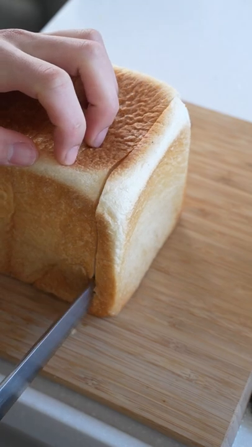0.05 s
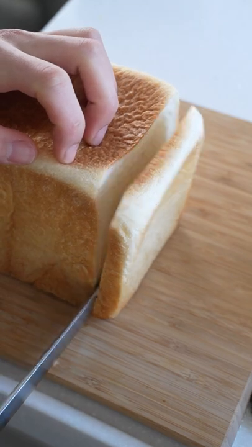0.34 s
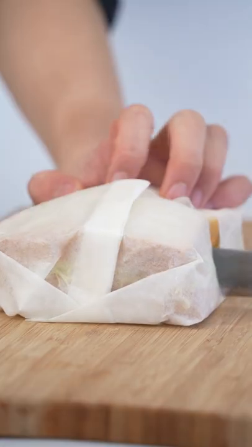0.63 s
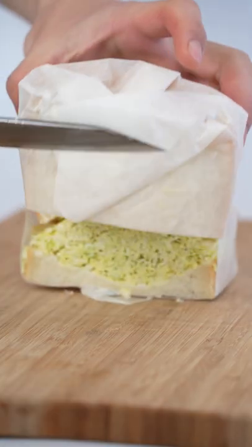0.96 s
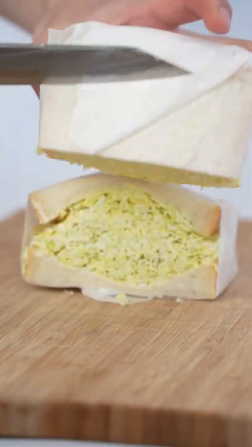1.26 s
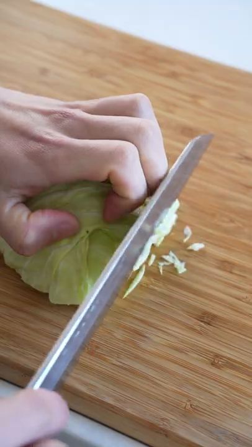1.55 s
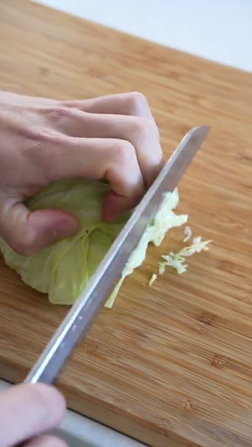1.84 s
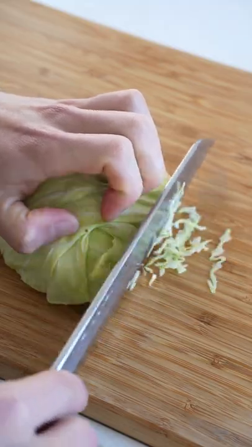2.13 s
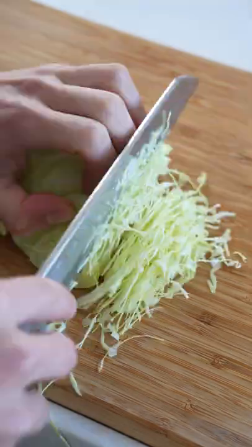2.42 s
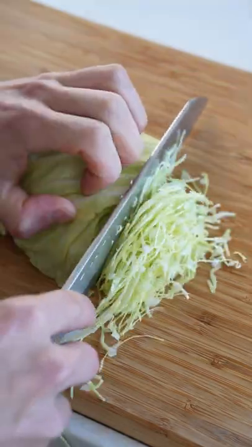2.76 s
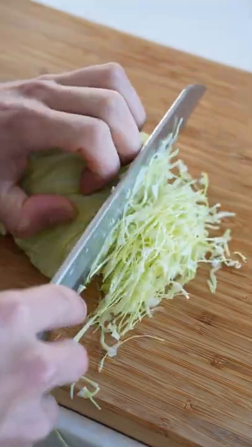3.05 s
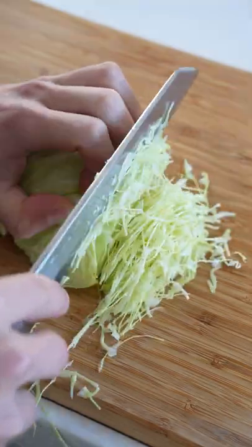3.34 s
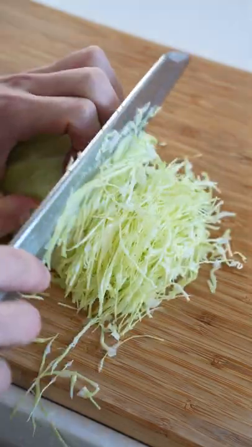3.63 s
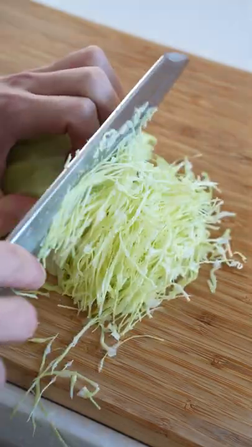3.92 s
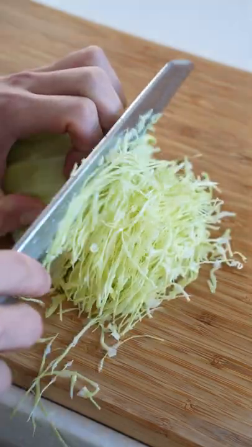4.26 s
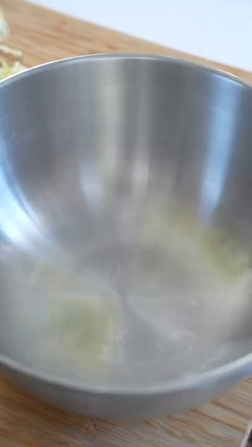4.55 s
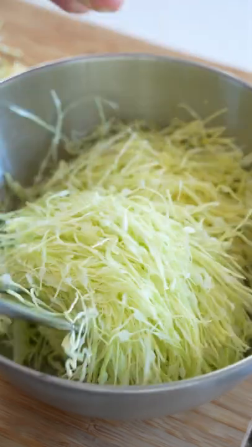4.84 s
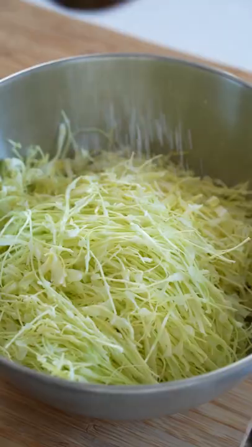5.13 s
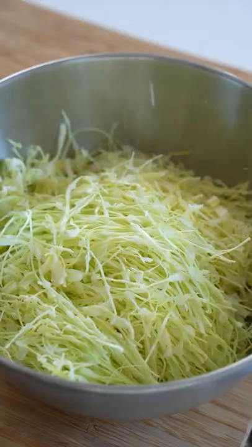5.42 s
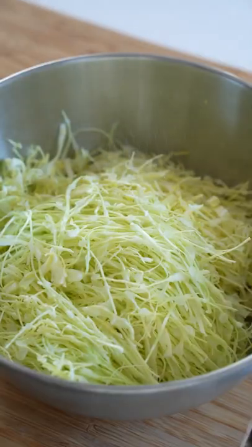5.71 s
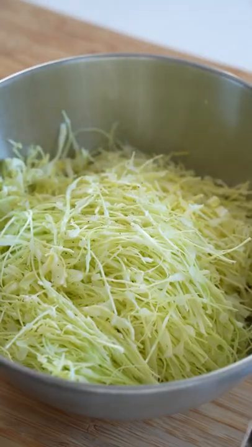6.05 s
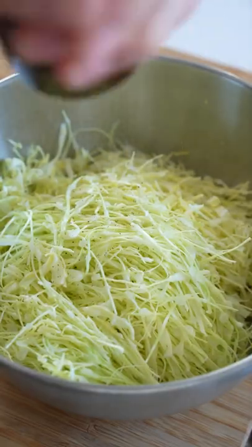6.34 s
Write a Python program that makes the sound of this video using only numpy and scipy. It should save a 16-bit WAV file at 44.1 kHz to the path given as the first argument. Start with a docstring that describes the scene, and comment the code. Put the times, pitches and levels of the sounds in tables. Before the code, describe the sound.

Paper tears, a knife knocks and crunches through cabbage on a wooden board, and grains rattle in a shaker, close up in a kitchen.

```python
"""Kitchen prep, close up, over a faint mains hum. First a knife parts a paper-wrapped sandwich:
the wrapper tears and rustles, with one low thump. From 1.3 s it shreds cabbage on a wooden board,
each stroke crunching through the leaves before the edge knocks the wood and the kitchen answers:
firm taps, then from 2.5 s quick light chops. Near 4.8 s the shreds land in a bowl, and from 5 s
a seasoning shaker is shaken over them, its grains sliding and rattling against the wall."""
import sys
import numpy as np
from scipy import signal
from scipy.fft import rfft, irfft
from scipy.io import wavfile
from scipy.ndimage import uniform_filter1d, map_coordinates

SR = 44100
rng = np.random.default_rng(int(sys.argv[2]) if len(sys.argv) > 2 else 0)


def to_wav(sig):
    """Store sig (one row per channel, or 1-D mono) as 16-bit WAV at the path in sys.argv[1].

    Samples outside -1..1 are clipped; the rate is SR.
    """
    pcm = np.clip(np.atleast_2d(sig), -1, 1) * 32767
    pcm = np.round(pcm).astype(np.int16)
    wavfile.write(sys.argv[1], SR, pcm.T)  # frames by channels


N = 281358


def amp(db):
    """Decibels to gain."""
    return 10 ** (np.asarray(db) / 20)


def unit(x):
    """Scale to rms 1."""
    return x / np.sqrt(np.mean(x ** 2) + 1e-20)


def clock(size):
    """Sample times in seconds."""
    return np.arange(size) / SR


def along(points, hz):
    """Read a curve of (f/Hz, value) points on a log frequency axis."""
    freqs, values = np.transpose(points)
    return np.interp(np.log(hz + 1), np.log(freqs + 1), values)


def fader(rows):
    """Gain per sample from (t/s, level/dB) points, silent outside them."""
    return amp(np.interp(clock(N), *np.transpose(rows), left=-120, right=-120))


def swell(start, rise, hold, release, db):
    """Envelope: up from 20 dB below, held, then down by 30 dB."""
    times = start + np.cumsum(np.abs([0, rise, hold, release]))
    return fader(list(zip(times, [db - 20, db, db, db - 30])))


def add(track, s, sound):
    """Mix a sound into a track at time s."""
    part = track[round(s * SR):][:len(sound)]
    part += sound[:len(part)]


def colour(x, spectrum, size=4096):
    """Minimum-phase EQ through (f/Hz, level/dB) points."""
    cepstrum = irfft(np.log(amp(along(spectrum, np.fft.rfftfreq(size, 1 / SR)))))
    cepstrum[1:size // 2] *= 2
    cepstrum[size // 2 + 1:] = 0
    impulse = irfft(np.exp(rfft(cepstrum)))
    return signal.fftconvolve(x, impulse)[:len(x)]


def grains(spectrum, per_s, spread_db, clump_db):
    """A texture of tiny random cracks, rms 1, bunched into clumps a few milliseconds long."""
    onsets = rng.random(N) < per_s / SR
    cracks = onsets * rng.standard_normal(N) * amp(spread_db * rng.standard_normal(N))
    clumps = map_coordinates(rng.standard_normal(N), [clock(N) * 250], order=1)
    return unit(colour(cracks * amp(clump_db * clumps), spectrum))


def snap(spectrum, t60):
    """A short noise burst of peak 1."""
    t = clock(SR // 20)
    burst = colour(rng.standard_normal(len(t)) * amp(-60 * t / t60), spectrum)
    return burst / np.abs(burst).max()


# EQ of the room's air, the hiss and the rumble: f/Hz, level/dB
AIR_EQ = [(60, -6.5), (120, 0.5), (180, -9.5), (270, -1.5), (400, -5), (580, -5), (800, -6.5), (1150, -3.5),
          (1800, -7.5), (2500, -17), (4000, -16), (8000, -42.5)]
HISS_EQ = [(500, -25.5), (2500, -3), (5000, 0), (8000, -6), (15500, -8)]
RUMBLE_EQ = [(10, -7), (26, 0.5), (45, -9), (95, -7.5), (140, -16.5), (300, -49.5), (1000, -100)]
# an appliance's drone: f/Hz, level/dB re the air
DRONE_TONES = [(242, -14), (484.5, -14.5), (608, -13.5)]
# the bed's mix from each cue on: t/s, then level/dB of air, hiss, hum, rumble
BED_MIX = [(0, -70, -75, -61.5, -62), (.45, -65.5, -77, -78, -61.5), (1.35, -60.5, -80, -64, -60),
           (2.45, -68.5, -82, -63.5, -64), (4.54, -66, -67.5, -59, -66), (4.85, -70.5, -74, -58, -62)]

def room_bed(mains_hz=60, blend_s=0.04):
    """Mains hum, low air with a drone in it, hiss and rumble; their levels shift at each cue."""
    t = clock(N)
    starts, *levels_db = np.transpose(BED_MIX)
    cue = np.searchsorted(starts[1:], t)
    blend = round(blend_s * SR)
    air, hiss, hum, rumble = [amp(uniform_filter1d(db[cue], size=blend)) for db in levels_db]
    noise = lambda spectrum: unit(colour(rng.standard_normal(N), spectrum))
    tone = lambda hz: unit(np.sin(2 * np.pi * hz * t))
    drone = sum(amp(db) * tone(hz) for hz, db in DRONE_TONES)
    room_tone = air * (noise(AIR_EQ) + drone)
    return hum * tone(mains_hz) + room_tone + hiss * noise(HISS_EQ) + rumble * noise(RUMBLE_EQ)


# the wrapper tears, then rustles as it is handled: t/s, hold/s, level/dB
RUSTLES = [(.416, 0.011, -44), (0.446, .11, -49), (.61, 0.052, -56.5), (0.681, .008, -52),
           (0.737, 0.0073, -57.5), (0.834, 0.0065, -57.5), (0.991, .01, -53), (1.124, .004, -59),
           (1.223, 0.0065, -61.5)]
# sharp crinkles: t/s, peak level/dB
PAPER_SNAPS = [(0.424, -27.5), (.684, -33), (.732, -31), (0.942, -41), (0.998, -37), (1.127, -43.5)]
# the paper's EQ: f/Hz, level/dB
PAPER_EQ = [(150, -38), (250, -8), (525, -5.5), (755, -3.5), (1120, -2), (1360, -1.5), (2060, -4.5),
            (5690, -7), (15500, -16)]
# the blade comes down through the sandwich: t/s, level/dB before the thud's gain
SANDWICH_THUMP = [(0.492, -49)]

def paper():
    """Fibres tear under the blade in a dense rasp and the wrapper snaps now and then."""
    rustles = [swell(s, rise=0.0033, hold=hold, release=0.12, db=db) for s, hold, db in RUSTLES]
    strain = sum(rustle ** 2 for rustle in rustles) ** 0.5
    out = strain * grains(PAPER_EQ, per_s=18000, spread_db=2, clump_db=1.3)
    for s, db in PAPER_SNAPS:
        add(out, s, amp(db) * snap(PAPER_EQ, t60=0.018))
    thump = worktop(SANDWICH_THUMP, hz=79.4, gain_db=10, t60=0.32, rise_s=0.054)
    return out + kitchen(out, wet_db=-15, decay_scale=0.8, predelay_s=0.0054) + thump


# the kitchen's reverb time: f/Hz, t60/s
KITCHEN_DECAY = [(100, .3), (400, 0.14), (1000, 0.15), (2000, 0.15), (5000, 0.17), (14000, 0.081)]

def kitchen(x, wet_db, decay_scale, predelay_s):
    """The kitchen's short, diffuse answer to x, wet only."""
    hz, t, bands = signal.stft(rng.standard_normal(SR // 2), SR, nperseg=256)
    t60 = decay_scale * along(KITCHEN_DECAY, hz)[:, None]
    tail = signal.istft(bands * amp(-60 * t / t60), SR, nperseg=256)[1]
    fade_in = np.clip(clock(len(tail)) / predelay_s - 1, 0, 1)
    response = rfft(tail * fade_in)
    band_power = np.abs(uniform_filter1d(np.abs(response) ** 2, size=120))
    tail = irfft(response / np.sqrt(band_power + 1e-12))  # a diffuse field carries all bands alike
    return amp(wet_db) * signal.fftconvolve(x, tail[:SR // 3])[:N]


def worktop(hits, hz, gain_db, t60, rise_s):
    """The worktop swells into a low thud after each blow."""
    out, t = np.zeros(N), clock(SR // 3)
    attack = 1 - np.exp(-(t / rise_s) ** 2)
    thud = np.sin(2 * np.pi * hz * t) * amp(-60 * t / t60) * attack
    for s, db, *_ in hits:
        add(out, s, amp(db + gain_db) * thud)
    return out


# the cabbage's EQ: f/Hz, level/dB
LEAF_EQ = [(180, -52.5), (300, -18.5), (424, -5), (781, -1), (1090, -1.5), (4070, -5.5), (6360, -7),
           (6900, -10.5), (11000, -9), (15500, -15.5)]
# cuts that stop short of the board: start t/s, end t/s, level/dB
SHORT_CUTS = [(2.429, 2.452, -47.5), (2.727, 2.787, -55)]

def leaf_crunch(tap_cut_s=0.04276, bite_s=0.01, part_s=0.029, rib_lead_s=0.036, shreds_db=-71):
    """Leaf cells burst ahead of each tap and chop, building as the edge bites, dying as leaves part."""
    cuts = [(s - tap_cut_s, s, db) for s, *_, db in TAPS]
    cuts += [(s - cut_s, s, db) for s, *_, cut_s, db in CHOPS] + SHORT_CUTS
    pressure = sum(swell(start - bite_s / 3, bite_s, end - start - bite_s, part_s, db)
                   for start, end, db in cuts)
    crunch = pressure * grains(LEAF_EQ, per_s=11000, spread_db=3, clump_db=2.8)
    for s, *_, db in TAPS:  # a rib snaps on the way down
        add(crunch, s - rib_lead_s, amp(db + 7.5) * snap(LEAF_EQ, t60=0.018))
    # loose shreds tick from the first tap to the last chop
    shred_gain = fader([(TAPS[0][0], shreds_db), (CHOPS[-1][0], shreds_db)])
    shreds = shred_gain * grains(LEAF_EQ, per_s=2500, spread_db=3, clump_db=4)
    return crunch + shreds + kitchen(crunch, wet_db=-24, decay_scale=1.0, predelay_s=0.0039)


def board_ring(modes, contact_s, low_cut_hz, vary_db, hardness):
    """The board's answer to one blow, peak 1; hardness tilts the modes above 1 kHz, in dB per octave."""
    t = clock(SR // 10)
    wave = np.zeros(len(t))
    for hz, db, t60 in modes:
        mode_db = db + hardness * np.log2(max(hz / 1000, 1)) + vary_db * rng.standard_normal()
        wave += amp(mode_db - 60 * t / t60) * np.sin(2 * np.pi * hz * t)
    # the contact time softens the attack, and a small board radiates little bass
    attack = 1 - np.exp(-t / contact_s)
    low_cut = signal.butter(3, low_cut_hz, "high", fs=SR, output="sos")
    wave = signal.sosfilt(low_cut, wave * attack)
    return wave / np.abs(wave).max()


def knife_hits(hits, modes, contact_s, low_cut_hz, click_t60):
    """Each blow rings the board a little differently and the steel edge adds a click."""
    click_eq = [(500, -36), (2500, 4.5), (5000, 9.5), (8000, -3.5), (15000, -10)]
    out = np.zeros(N)
    for s, db, click_db, hardness, *_ in hits:
        add(out, s, amp(db) * board_ring(modes, contact_s, low_cut_hz, vary_db=2.66, hardness=hardness))
        add(out, s, amp(db + click_db) * snap(click_eq, click_t60))
    return out


# firm hits: t/s, peak level/dB, click level/dB re peak, hardness/dB per octave, crunch level/dB
TAPS = [(1.3332, -17.5, -12.5, -0.5, -79), (1.4731, -10.5, -23.5, -4.5, -57.5),
        (1.4828, -14, -31, -4, -62.5), (1.633, -2, -25.5, -2, -51), (1.7948, -1, -19.5, -0.5, -49.5),
        (1.9654, -3, -22.5, -3, -45.5), (2.1352, -2.5, -23.5, 2.5, -46), (2.304, -1.5, -20.5, 5, -46.5)]
# the board's modes under a firm tap: f/Hz, level/dB, t60/s
TAP_MODES = [(280.6, -15.5, 0.023), (475.2, -10, 0.017), (633, -6.5, 0.016), (717.4, -12.5, 0.027),
             (945, 2, 0.014), (1016, -4, 0.014), (1510, -5, 0.012), (1987, -5.5, 0.013),
             (2146, -12.5, 0.017), (3720, -29, 0.0093)]
# reverb send EQ, what the whole board radiates into the room: f/Hz, level/dB
BOARD_SEND_EQ = [(150, -7.5), (450, 8), (750, -3.5), (980, -2), (1300, 3.5), (1700, 3.5), (2300, -3.5),
                 (3000, 4), (3900, 1.5), (6000, -2.5)]

def firm_taps():
    """The first strokes land squarely on the board and fill the room."""
    knocks = knife_hits(TAPS, TAP_MODES, contact_s=0.00097, low_cut_hz=232, click_t60=0.011)
    tail = kitchen(colour(knocks, BOARD_SEND_EQ), wet_db=-13.5, decay_scale=0.94, predelay_s=0.0028)
    return knocks + tail + worktop(TAPS, hz=95.3, gain_db=-22.5, t60=0.17, rise_s=0.035)


# light hits: t/s, peak level/dB, click level/dB re peak, hardness/dB per octave,
# lead of the edge's first touch/s, time in the leaves/s, crunch level/dB
CHOPS = [(2.5277, -16, -30, 3.5, 0.015, 0.055, -54), (2.6451, -18, -37, 3.5, 0.016, 0.021, -56),
         (2.9139, -9.5, -25, -13, 0.0026, .045, -55.5), (3.0567, -17, -22.5, 3.5, 0.018, 0.05, -61),
         (3.1877, -11, -27, 6.5, 0.01, .045, -52), (3.3105, -12, -38, -8, 0, 0.029, -54.5),
         (3.4483, -21.5, -24, -12, 0.0017, 0.047, -55), (3.5072, -21.5, -42, -20, 0.0005, 0.018, -58.5),
         (3.6229, -12.5, -42, -2, 0, 0.03, -56), (3.7606, -15, -21, 8, 0.017, 0.05, -54.5),
         (3.895, -24.5, -42, -43, 0.01, 0.049, -54), (4.0035, -15.5, -20.5, 8.5, .011, 0.021, -58),
         (4.1174, -16, -17.5, 9, 0.013, .022, -59), (4.2344, -16.5, -24, -4, 0.0056, .035, -52),
         (4.3738, -18.5, -23.5, 5, 0.021, .043, -55.5), (4.483, -11, -26, 6, 0.0019, 0.033, -52)]
# the board's modes at the spot of the light chops, with a longer low ring: f/Hz, level/dB, t60/s
CHOP_MODES = [(287, -10.5, 0.042), (470, -23.5, 0.026), (548, -10.5, 0.034), (671, -11, 0.038),
              (908, -3.5, 0.016), (1020, 5, 0.013), (1314, 12.5, 0.0067), (1530, -8, 0.0098),
              (2036, -9, 0.019), (2267, -16.5, 0.013), (4480, -17.5, 0.0052)]

def light_chops(rocked_lead_s=0.012, tip_db=-5, skid_db=-20, skid_rise_s=0.0014, overrun_s=0.0046):
    """A well rocked blade lands tip first; the edge chatters along the wood, then the heel lands."""
    chatter_eq = [(200, 2), (1000, -4), (2500, -4.5), (8000, -2.5)]
    friction = grains(chatter_eq, per_s=2100, spread_db=-1, clump_db=7)
    wood = board_ring(CHOP_MODES, contact_s=0.00016, low_cut_hz=230, vary_db=-2, hardness=0)
    chatter = unit(signal.fftconvolve(friction, wood)[:N])
    tips, skid = [], np.zeros(N)
    for s, db, click_db, hardness, lead, *_ in CHOPS:
        touch = s - lead
        if lead > rocked_lead_s:
            tips.append((touch, db + tip_db, click_db, hardness))
        skid += swell(touch - skid_rise_s, skid_rise_s, lead + overrun_s, release=0.028, db=db + skid_db)
    knocks = knife_hits(CHOPS + tips, CHOP_MODES, contact_s=0.00045, low_cut_hz=264, click_t60=0.0088)
    out = knocks + skid * chatter
    thuds = worktop(CHOPS, hz=95, gain_db=-26.5, t60=0.14, rise_s=0.0079)
    return out + kitchen(out, wet_db=-17, decay_scale=0.6, predelay_s=0.0014) + thuds


# envelope of the drop into the bowl: t/s, level/dB
DROP_ENVELOPE = [(4.74, -76), (4.768, -47), (4.779, -37.5), (4.8, -45.5), (4.82, -56.5), (4.87, -81)]
# the landing shreds' EQ: f/Hz, level/dB
DROP_EQ = [(240, -43.5), (400, -13.5), (715, -14.5), (784, -9), (1610, -3.5), (3850, -12), (5310, -4),
           (10600, -8.5), (15500, -19.5)]

def shreds_into_bowl():
    """The heap of shreds lands with a soft, moist rustle."""
    return fader(DROP_ENVELOPE) * grains(DROP_EQ, per_s=9000, spread_db=3, clump_db=2)


# grains slide along the shaker: t/s, rise/s, hold/s, level/dB
SLIDES = [(4.997, 0.0083, .008, -48), (5.043, 0.0081, 0.056, -38), (5.25, 0.022, .035, -48),
          (5.324, 0.0024, 0.0039, -32), (5.504, 0.041, 0.033, -41), (5.739, 0.028, 0.0073, -39),
          (5.8, 0.038, 0.035, -39), (6.061, 0.0072, 0.032, -46), (6.333, 0.037, .03, -39)]
# clumps of grains strike its wall: t/s, peak level/dB, main ring f/Hz
RATTLES = [(5.308, -28.5, 1900), (5.33, -17.5, 1390), (5.335, -15.5, 2700), (5.555, -21, 2780),
           (5.661, -43.5, 2780), (5.726, -40, 1490), (5.766, -26, 2860), (5.796, -21.5, 7400),
           (5.831, -13.5, 2920), (5.838, -17.5, 5200), (5.863, -18, 3020), (6.007, -37.5, 1280),
           (6.107, -27, 2815), (6.1347, -27, 14400), (6.137, -12, 3290), (6.141, -22.5, 3540),
           (6.271, -39.5, 3020)]
# the shaker body's EQ: f/Hz, level/dB
SHAKER_EQ = [(180, -43), (300, -17.5), (450, -13), (750, -13), (1300, -5.5), (1700, -8.5), (2300, -4.5),
             (2950, 0), (3500, -10), (4400, -7), (5200, -5), (6200, -13.5), (7350, -8), (8100, -8),
             (9000, -18.5), (11500, -13), (15800, -23)]

def shaker(scatter_db=-25.5):
    """Grains rush from end to end, about four shakes a second, strike the wall and scatter."""
    slides = [swell(s, rise, hold, release=0.049, db=db) for s, rise, hold, db in SLIDES]
    scatters = [swell(s, rise=0.00079, hold=0.0035, release=0.036, db=db + scatter_db)
                for s, db, _ in RATTLES]
    flow = sum(part ** 2 for part in slides + scatters) ** 0.5
    out = flow * grains(SHAKER_EQ, per_s=5000, spread_db=3.5, clump_db=3.5)
    for s, db, hz in RATTLES:
        # each spot on the wall favours one band
        spot_eq = [(hz / 5, -32), (hz / 1.23, -10), (hz, 0), (hz * 1.06, -9), (hz * 4, -22)]
        strike = snap(spot_eq, t60=0.013) + amp(-5.5) * snap(SHAKER_EQ, t60=0.0044)
        add(out, s, amp(db) * strike / np.abs(strike).max())
    return out + kitchen(out, wet_db=-13.5, decay_scale=0.85, predelay_s=0.0026)


def scene():
    """All layers in one mono mix, alike in both channels."""
    knife_work = paper() + firm_taps() + light_chops() + leaf_crunch()
    mono = knife_work + shreds_into_bowl() + shaker() + room_bed()
    return np.array([mono, mono])


def record(dry):
    """A steep high cut at 16.1 kHz over the whole mix."""
    high_cut = signal.firwin(201, 16100, fs=SR)
    return signal.fftconvolve(dry, high_cut[None], mode="same", axes=1)


dry = scene()
out = record(dry)
to_wav(out)
```